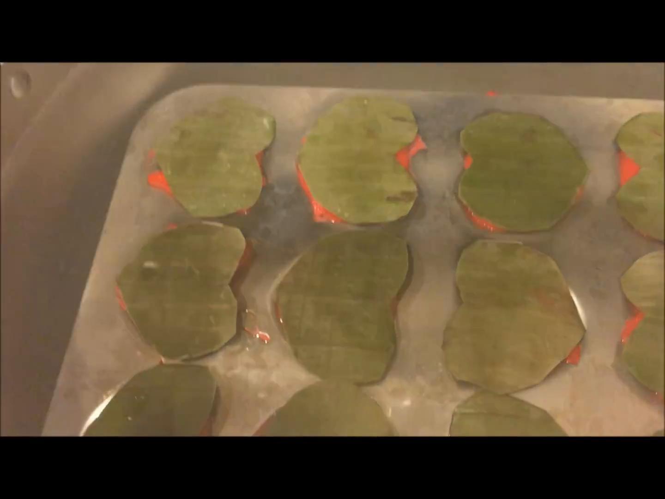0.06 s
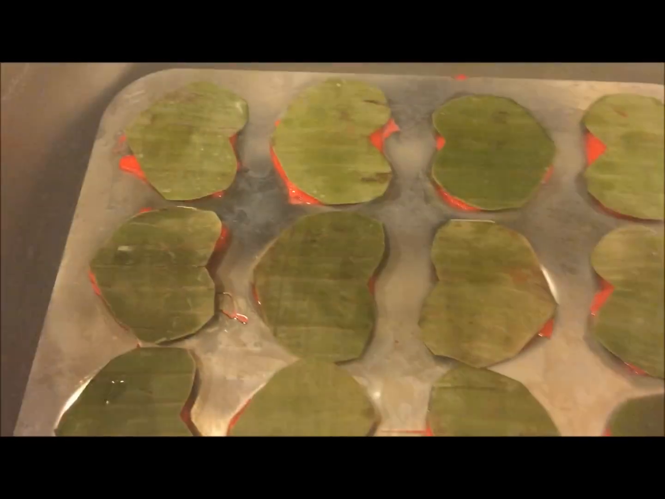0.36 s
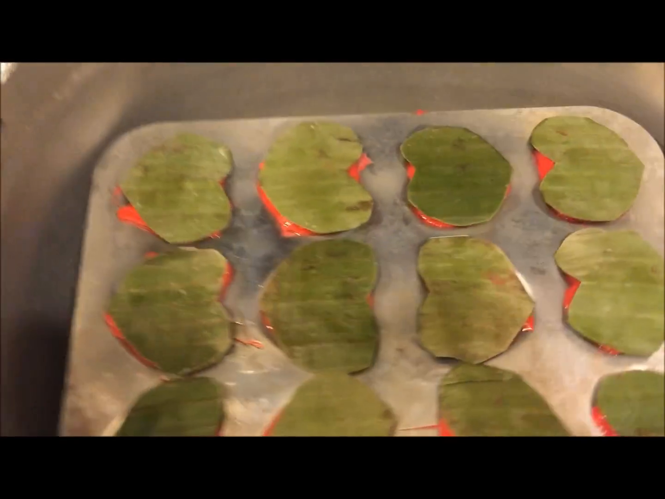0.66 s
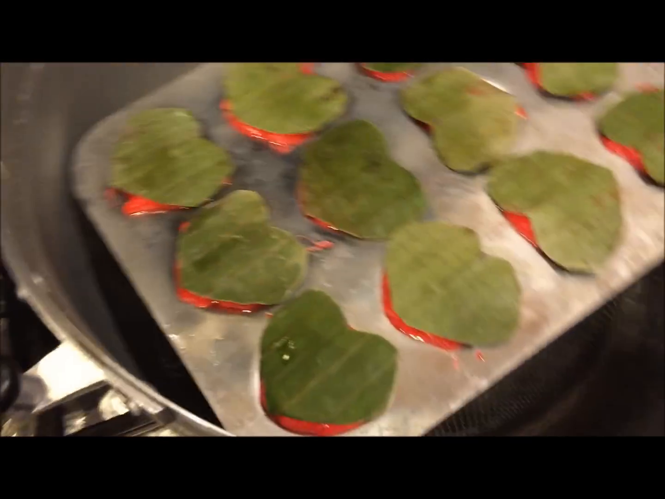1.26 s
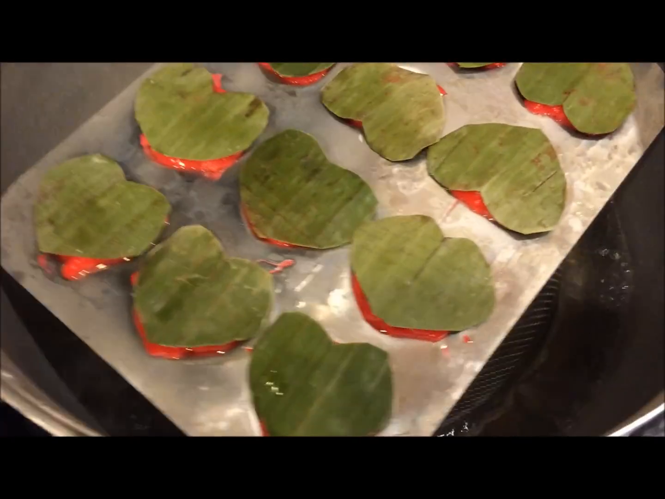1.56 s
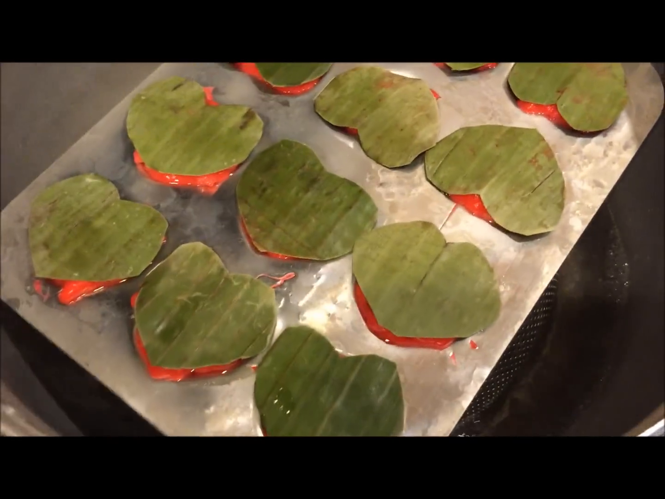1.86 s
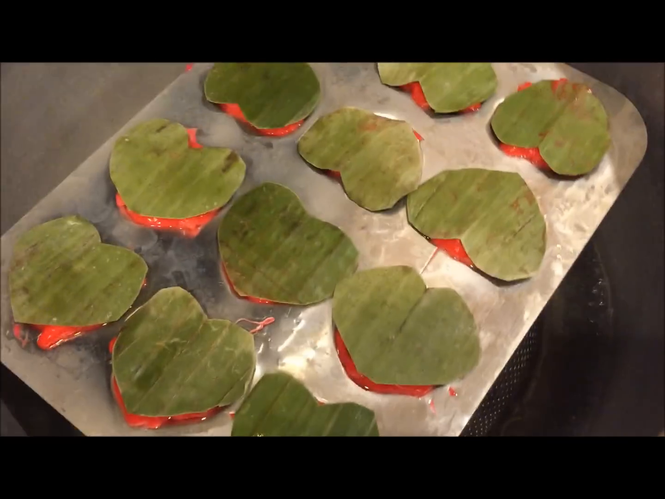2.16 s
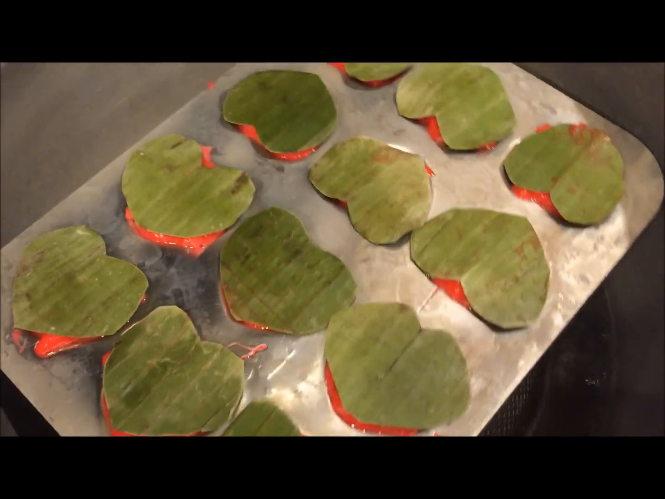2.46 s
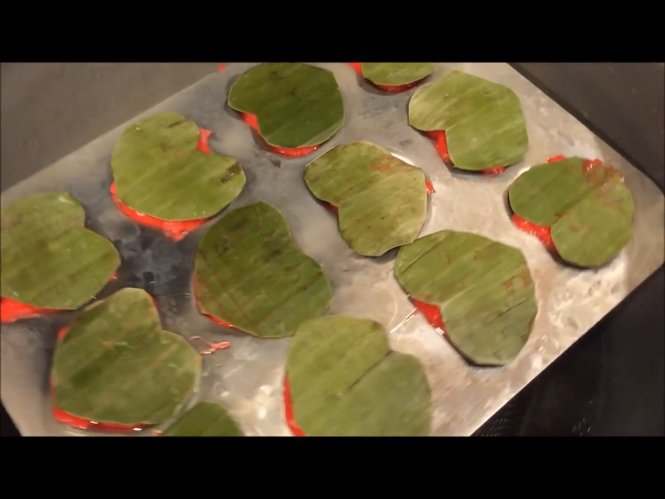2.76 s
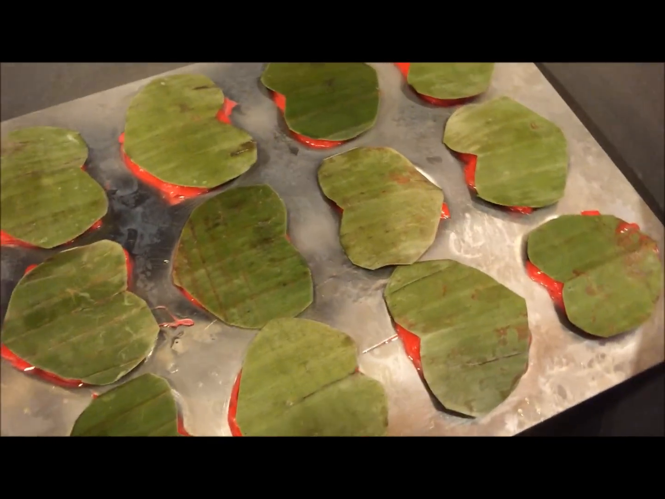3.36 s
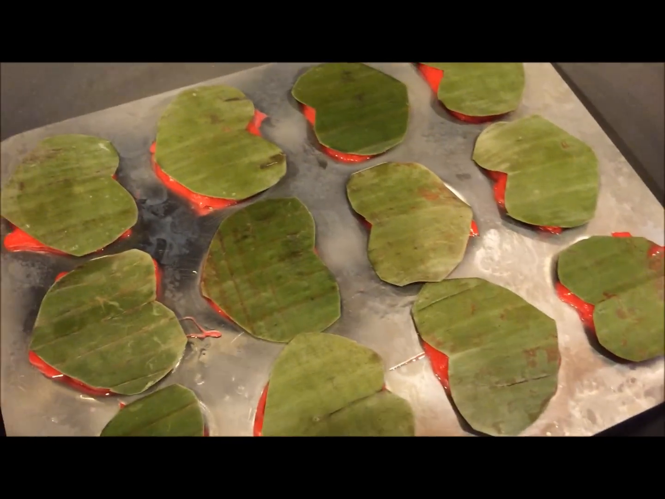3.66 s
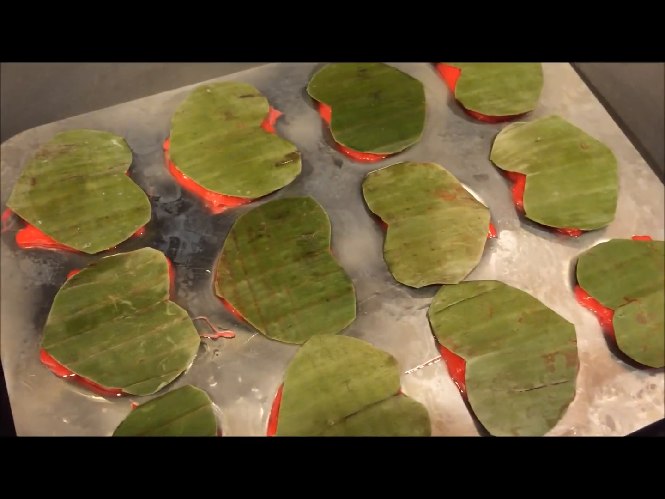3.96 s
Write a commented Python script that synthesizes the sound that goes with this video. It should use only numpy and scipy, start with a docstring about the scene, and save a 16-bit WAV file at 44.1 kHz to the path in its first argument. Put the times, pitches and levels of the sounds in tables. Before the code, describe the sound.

Steady steam hiss and low burner hum, broken once by a ringing clank of cookware.

```python
"""At a gas stove, a wide metal steamer simmers, heard from just above by a hand-held microphone.
Turbulent steam hisses and droplets sizzle over flame noise that resonates in the pot's hollows.
The steam whistles faintly once. A pan slides, clanks and settles, ringing in its natural modes.
A few soft knocks sound in the pot, and low buffets of air and handling reach the microphone."""
import sys
import numpy as np
from scipy import signal
from scipy.fft import rfft, irfft
from scipy.io import wavfile
from scipy.ndimage import uniform_filter1d

SR = 44100
rng = np.random.default_rng(int(sys.argv[2]) if len(sys.argv) > 2 else 0)


def wav_record(signal):
    """Record a signal, one row per channel, as 16-bit PCM in the file named by sys.argv[1]."""
    frames = np.transpose(np.atleast_2d(signal))
    bounded = np.clip(frames, -1, 1)
    # unit amplitude maps onto the largest positive 16-bit level
    quanta = np.round(bounded * 32767).astype(np.int16)
    wavfile.write(sys.argv[1], SR, quanta)


N = 176400
TIME = np.arange(N) / SR
HZ = np.fft.rfftfreq(N, 1 / SR)

# Spectrum of the steam: frequency_hz, density_db
STEAM_SPECTRUM = [(900, -32), (1800, -16), (2600, -12), (3150, -6), (3600, -6.5), (4150, -2), (4650, -1),
                  (5500, -2), (6000, -5.5), (7000, -6), (7700, -9), (8400, -6), (9300, -6), (10000, -7.5),
                  (10450, -13), (10900, -8), (13000, -7.5), (15300, -9.5)]
# Steam level as the microphone moves over the pot: time_s, gain_db
STEAM_GAIN = [(0, 0), (.33, 1), (.6, 0.4), (.72, -.5), (1.15, 0), (1.45, -0.5), (1.6, -1.5), (1.73, -3.5),
              (1.86, -0.7), (2.25, -0.5), (2.5, -3), (2.72, -2), (2.88, 0), (3.05, 0.4), (3.45, 1),
              (3.7, 0.5), (4, 0.5)]
# Swells and dips of the steam's top treble: time_s, gain_db
FIZZ_GAIN = [(0, 0), (1.2, 0), (1.34, -2.5), (1.52, -2), (1.58, 2), (1.66, -1.5), (1.87, .7), (2.23, -2),
             (2.34, 0.3), (2.42, -0.5), (2.65, 0.5), (3.3, 0.6), (3.5, -.6), (4, -1.5)]
# Broad rush of the flame: frequency_hz, density_db
FLAME_SPECTRUM = [(20, -32), (45, -10), (70, -4.5), (98, 4), (130, -1), (170, 0.5), (210, -6.5), (280, -3),
                  (400, -8), (480, -13), (750, -13), (1050, -11.5), (1450, -13), (1800, -18.5), (3000, -23),
                  (8000, -47)]
# Hollows under and inside the pot: centre_hz, width_hz, level_db
CAVITY_MODES = [(253.4, 15.6, -67), (299, 34, -71.5), (322, 32, -59), (376.7, 41.4, -62), (574, 51, -72.5),
                (855, 86, -64.5), (2132, 135, -69.5)]
# Slow changes in the burner's level: time_s, gain_db
BURNER_GAIN = [(0, 2), (.55, 1), (.85, -0.5), (1.4, 0.3), (1.9, 1), (2.7, 0.1), (3.3, 0.6), (4, 0.4)]
# Puffs on the microphone: start_s, length_s, level_db
BUFFET_EVENTS = [(-.03, 0.06, -41), (0.059, 0.078, -48.5), (.1, 0.18, -57), (0.416, 0.18, -51.5),
                 (2.553, 0.043, -52), (2.79, 0.073, -50.5), (2.921, 0.062, -50.5), (3.706, 0.055, -50.5),
                 (3.791, 0.063, -45.5), (3.846, 0.15, -59)]
# Their spectrum: frequency_hz, density_db
BUFFET_SPECTRUM = [(10, -22), (22, 0), (33, -9), (55, 1.5), (80, -1.5), (130, -19), (250, -21), (800, -70)]
# Course of the whistle: time_s, pitch_hz, level_db
WHISTLE_PATH = [(1.105, 3185, -80), (1.14, 3168, -60), (1.18, 3170, -58.5), (1.215, 3135, -65),
                (1.255, 3145, -61), (1.295, 3160, -61), (1.322, 3175, -64), (1.34, 3175, -80)]
# Main modes of the pan: pitch_hz, gain_db, t60_s
PAN_MODES = [(556, -14, .3), (645, -7, .25), (885, -12.5, .55), (941, -8, .28), (1034, -16, .55),
             (1053, -11, .2), (1367, -14, .33), (1403, -15, .3), (1523, -14.5, 1.05), (1665, -3.5, .3),
             (1701, -8, .16), (1741, 1.5, .25), (1847, -9, .28), (2014, -10, .65), (2254, -8, .3),
             (2425, -2.5, .52), (2441, -6, .3), (2781, -4, .45), (3494, -18, .4), (3962, -15, .25),
             (4027, -14, .35), (4455, -12, .25), (4860, -13, .22), (5198, -14, .42), (5609, -17, .45),
             (6309, -16, .3)]
# Soft knocks in the pot: start_s, level_db, pitch_hz, t60_s
POT_KNOCKS = [(1.874, -56, 1480, 0.12), (1.875, -56, 190, .2), (2.24, -60, 600, .12),
              (2.478, -61, 950, 0.14), (2.503, -56.5, 1020, 0.13), (2.598, -59, 950, 0.13),
              (3.469, -56, 710, 0.1)]
# Contacts of the clank; softness weakens the modes far from BODY_HZ:
# start_s, ring_db, softness_db_per_octave, clatter_db, tilt_db_per_octave, thud_db
CONTACTS = [(2.0072, -35.5, 0, -44, -1, -60), (2.011, -54, 5, -43, 4.5, -40),
            (2.018, -43, -2.5, -45.5, -1, -57), (2.035, -48.5, -3.5, -44.5, 3, -48),
            (2.0705, -34, 22, -44.5, 0.1, -37), (2.093, -37.5, 33, -60, -2, -58),
            (2.203, -53, 0, -56.5, -1, -67)]
# Dense modes and scrape of a contact: frequency_hz, density_db
CLATTER_SPECTRUM = [(200, -17), (450, 2), (640, -7.5), (790, -8), (950, -18), (1150, -3.5), (1400, -1),
                    (1750, 1.5), (2400, 2.5), (3000, -2.5), (3500, -5), (4500, -5.5), (6000, -7.5),
                    (7500, -12.5), (9500, -22.5), (15000, -28)]
# Decay of the clatter in the kitchen: frequency_hz, t60_s
KITCHEN_DECAY = [(300, 0.2), (900, 0.62), (2200, 0.65), (4000, 0.41), (8000, 0.34), (15000, 0.22)]

STEAM_DB, SIZZLE_DB, DROPS_PER_S, FIZZ_HZ = -50.5, -60, 900, 6460
SLIDE_S, RUB_DB, SQUEAK_DB = 1.872, -58.5, -58
BODY_HZ, RING_RISE_S, IMPACT_RISE_S = 886, 0.0031, 0.0018


def amp(db):
    """Amplitude ratio of a level in decibels."""
    return 10 ** (np.asarray(db) / 20)


def unit(x):
    """Normalisation to rms 1."""
    return x / np.sqrt(np.mean(x ** 2) + 1e-30)


def read(points, hz):
    """Interpolation on a log-frequency axis."""
    f, value = np.transpose(points)
    return np.interp(np.log(hz + 1), np.log(f + 1), value)


def colour(x, db):
    """Linear filtering by a gain per frequency; rms 1."""
    return unit(irfft(rfft(x) * amp(db), N))


def noise(db):
    """Gaussian noise of a given spectrum; rms 1."""
    return colour(rng.standard_normal(N), db)


def resonance(hz, width_hz):
    """Response of a steep-sided resonator, in dB."""
    return -20 * np.log10(1 + ((HZ - hz) / (.78 * width_hz)) ** 2)


def drift(rate_hz):
    """Random modulation of rms 1."""
    knots = rng.standard_normal(size=2048)
    return unit(np.interp(TIME * 2 * rate_hz, np.arange(len(knots)), knots))


def swell(start, length):
    """Envelope with a rounded rise and fall."""
    return np.sqrt(abs(np.sin(np.pi * np.clip((TIME - start) / length, 0, 1))))


def struck(start, rise_s):
    """Time since an impact, and its linear attack."""
    age = np.maximum(TIME - start, 0)
    return age, np.minimum(age / rise_s, 1)


def decay(age, t60):
    """Exponential damping: 60 dB in t60 seconds."""
    return np.exp(-np.log(1000) * age / t60)


def patchy(x, depth_db):
    """Random modulation in time and frequency: patches of the spectrum come and go."""
    z = signal.stft(x, nperseg=512)[2]
    field = uniform_filter1d(rng.standard_normal(z.shape), size=9, axis=0)
    field = unit(uniform_filter1d(field, size=16, axis=1))
    return unit(signal.istft(z * amp(depth_db * field), nperseg=512)[1][:N])


def pot_ripple(depth_db=1.0, spacing_hz=55.1):
    """Interference of reflections in the pot, as a random spectral ripple in dB."""
    grid = np.arange(0, SR / 2, spacing_hz)
    return depth_db * np.interp(HZ, grid, rng.standard_normal(SR)[:len(grid)])


def steam():
    """Turbulence hisses and bursting droplets add shot noise of the same spectrum."""
    shape = read(STEAM_SPECTRUM, HZ) + pot_ripple()
    hiss = amp(STEAM_DB) * patchy(noise(shape), depth_db=1.0)
    drops = (rng.random(N) < DROPS_PER_S / SR) * rng.choice([-1, 1], N)
    drop_db = 3.2 * np.minimum(rng.exponential(1, N), 4)
    jet = hiss + amp(SIZZLE_DB) * colour(drops * amp(drop_db), shape)
    fizz = irfft(rfft(jet) / (1 + (FIZZ_HZ / (HZ + 1)) ** 10), N)
    jet = jet - fizz + fizz * amp(np.interp(TIME, *np.transpose(FIZZ_GAIN)))
    flutter_db = 0.37 * drift(rate_hz=21)
    return jet * amp(np.interp(TIME, *np.transpose(STEAM_GAIN)) + flutter_db)


def burner(rush_db=-56.5):
    """Cavity resonance: flame noise hums in the hollows under and inside the pot."""
    hum = sum(amp(db) * noise(resonance(hz, width)) for hz, width, db in CAVITY_MODES)
    rush = amp(rush_db) * patchy(noise(read(FLAME_SPECTRUM, HZ)), depth_db=1.83)
    return (hum + rush) * amp(np.interp(TIME, *np.transpose(BURNER_GAIN)))


def buffets():
    """Pressure fluctuations from moving air and handling rumble on the microphone."""
    envelope = sum(amp(db) * swell(start, length) for start, length, db in BUFFET_EVENTS)
    return noise(read(BUFFET_SPECTRUM, HZ)) * envelope


def whistle(waver_hz=32, tremor=.3):
    """Flow-driven oscillation: steam in a gap sings one thin, trembling note."""
    times, hz, db = np.transpose(WHISTLE_PATH)
    turns = np.cumsum(np.interp(TIME, times, hz) + waver_hz * drift(rate_hz=100)) / SR
    tone = np.sin(2 * np.pi * turns) * (1 + tremor * drift(rate_hz=60))
    return np.interp(TIME, times, amp(db), left=0, right=0) * unit(tone)


def slide(squeak_hz=1870, sag_hz_per_s=4800, waver_hz=129, tilt_db_per_octave=-4.5):
    """Friction of metal on metal drives the pan's modes and gives a rough, falling squeak."""
    response = sum(amp(db + tilt_db_per_octave * np.log2(hz / 1000) + resonance(hz, width_hz=70))
                   for hz, db, _ in PAN_MODES)
    rub = amp(RUB_DB) * swell(SLIDE_S, length=0.13) * noise(20 * np.log10(response))
    pitch = squeak_hz - sag_hz_per_s * (TIME - SLIDE_S) + waver_hz * drift(rate_hz=220)
    squeak = np.sin(2 * np.pi * np.cumsum(pitch) / SR)
    return rub + amp(SQUEAK_DB) * swell(SLIDE_S, length=0.15) * squeak


def knocks(width_octaves=0.38, tick_db=7, tick_s=0.0033):
    """Damped impacts in the pot: a band of noise with a short tick and a soft tail."""
    out = np.zeros(N)
    for start, db, hz, t60 in POT_KNOCKS:
        age, attack = struck(start, rise_s=0.0025)
        detuning = np.log2((HZ + 1) / hz) / width_octaves
        body = noise(-10 * np.log10(1 + detuning ** 6))
        out += amp(db) * attack * body * (decay(age, t60) + amp(tick_db) * np.exp(-age / tick_s))
    return out


def ring(room_gain=.5, room_build_s=.06):
    """Free vibration: each contact adds energy to the pan's modes, which waver with room echoes."""
    out = np.zeros(N)
    blows = [(*struck(start, RING_RISE_S), ring_db, softness)
             for start, ring_db, softness, *_ in CONTACTS]
    since_first, room = struck(CONTACTS[0][0], room_build_s)
    for hz, db, t60 in PAN_MODES:
        energy = np.zeros(N)
        for age, attack, ring_db, softness in blows:
            strength = amp(ring_db + db - softness * abs(np.log2(hz / BODY_HZ)))
            energy += (strength * attack * decay(age, t60)) ** 2
        phase = 2 * np.pi * hz * since_first
        echoes = (drift(rate_hz=22) * np.cos(phase) + drift(rate_hz=22) * np.sin(phase)) / np.sqrt(2)
        out += np.sqrt(energy) * (np.sin(phase) + room_gain * room * echoes)
    return out


def clatter(mode_count=480, scrape_db=-7, crack_db=6, crack_s=0.0077):
    """Impulsive excitation: each contact cracks and sets off hundreds of quickly dying modes."""
    out = np.zeros(N)
    modes = rng.random(len(HZ)) < mode_count / len(HZ)
    for start, _, _, clatter_db, tilt, _ in CONTACTS:
        partials = unit(irfft(modes * np.exp(2j * np.pi * rng.random(len(HZ))), N))
        shape = read(CLATTER_SPECTRUM, HZ) + tilt * np.log2(np.maximum(HZ, 500) / 500)
        dense = colour(partials + amp(scrape_db) * rng.standard_normal(N), shape)
        hz, t, bands = signal.stft(dense, SR, nperseg=256)
        bands *= decay(np.maximum(t - start, 0), read(KITCHEN_DECAY, hz)[:, None])
        tail = signal.istft(bands, nperseg=256)[1][:N]
        age, attack = struck(start, IMPACT_RISE_S)
        crack = amp(crack_db) * np.exp(-age / crack_s)
        out += amp(clatter_db) * attack * (1 + crack) * tail
    return out


def thuds(pitch_hz=650, waver_hz=95, t60_s=0.047):
    """Heavy damping: the support under the pan answers each contact with a dead knock."""
    out = np.zeros(N)
    for start, *_, thud_db in CONTACTS:
        age, attack = struck(start, IMPACT_RISE_S)
        turns = np.cumsum(pitch_hz + waver_hz * drift(rate_hz=200)) / SR
        out += amp(thud_db) * attack * decay(age, t60_s) * unit(np.sin(2 * np.pi * turns))
    return out


def scene():
    """Superposition of all sources at the stove, in mono."""
    simmer = steam() + whistle() + burner()
    pan = slide() + ring() + clatter() + thuds()
    return (simmer + pan + knocks() + buffets())[None]


def record(dry):
    """Band limiting: the recorder passes 27 Hz to 15380 Hz."""
    low_cut = signal.butter(3, 27, "highpass", fs=SR, output="sos")
    high_cut = signal.firwin(1023, 15380, window=("kaiser", 8), fs=SR)
    return signal.oaconvolve(signal.sosfilt(low_cut, dry), high_cut[None], "same")


dry = scene()
out = record(dry)
wav_record(out)
```